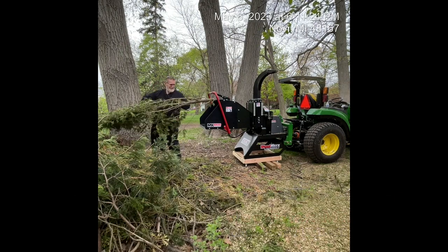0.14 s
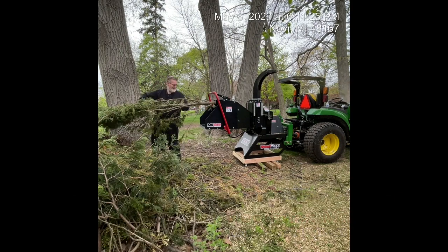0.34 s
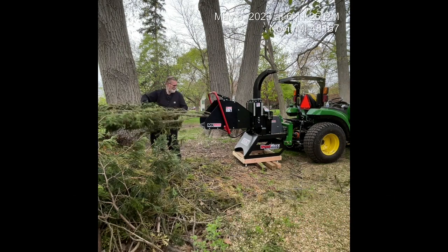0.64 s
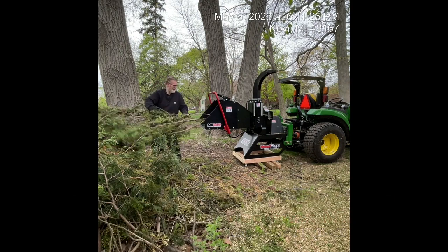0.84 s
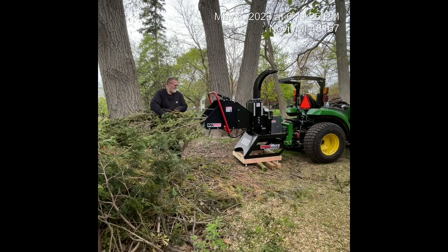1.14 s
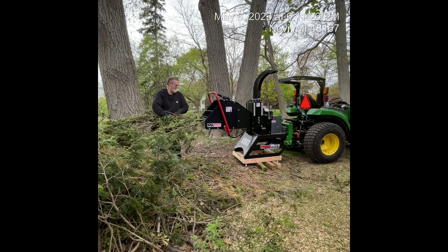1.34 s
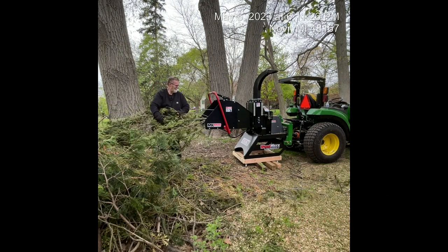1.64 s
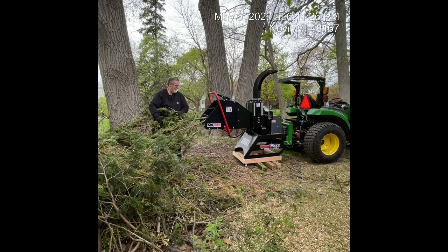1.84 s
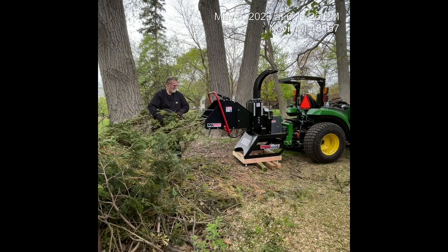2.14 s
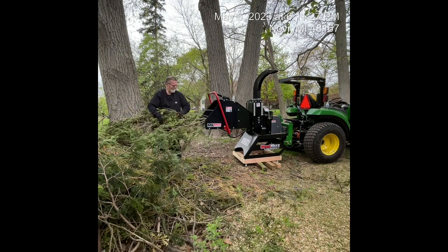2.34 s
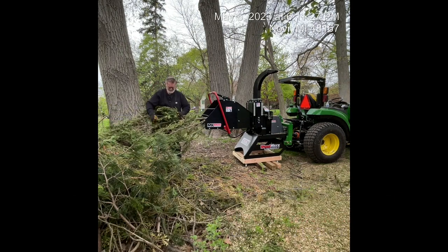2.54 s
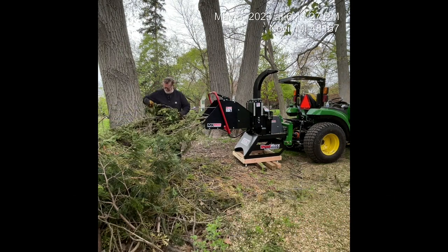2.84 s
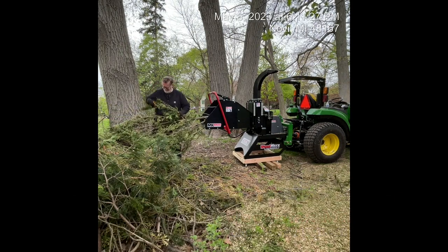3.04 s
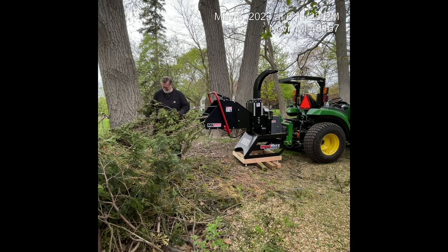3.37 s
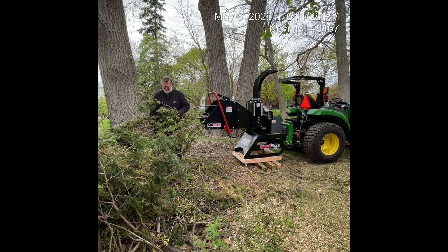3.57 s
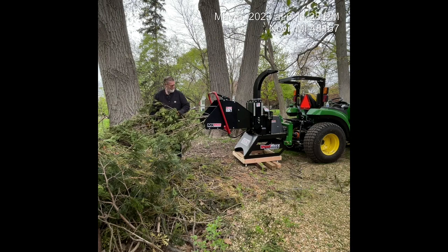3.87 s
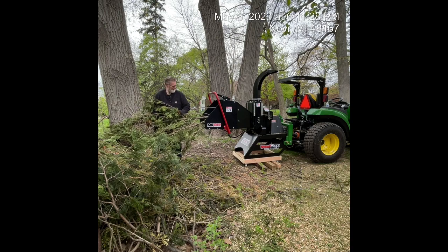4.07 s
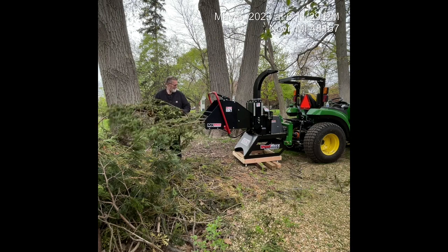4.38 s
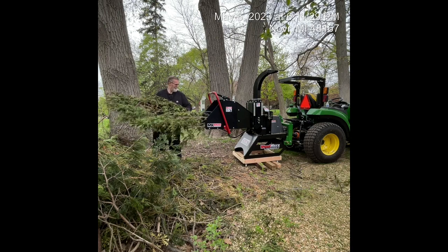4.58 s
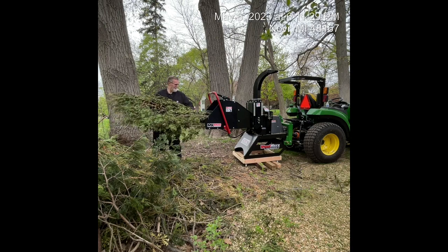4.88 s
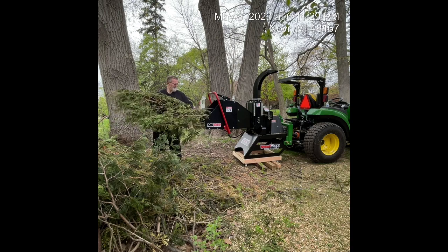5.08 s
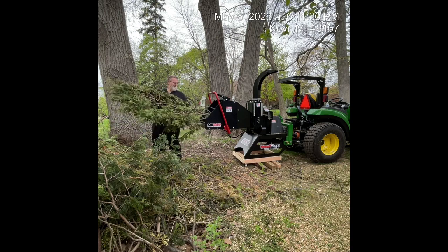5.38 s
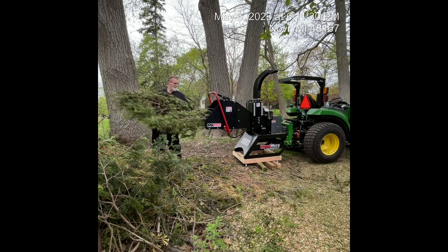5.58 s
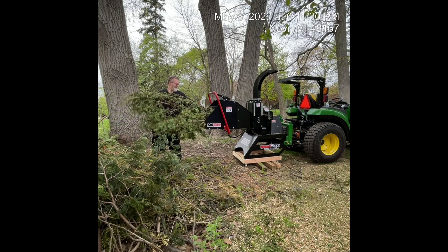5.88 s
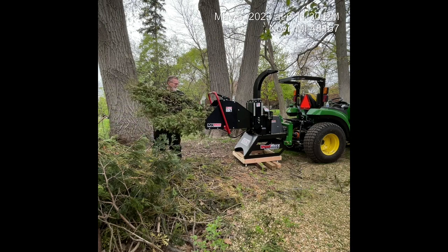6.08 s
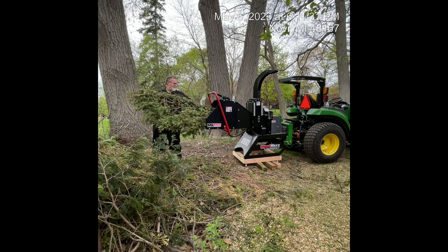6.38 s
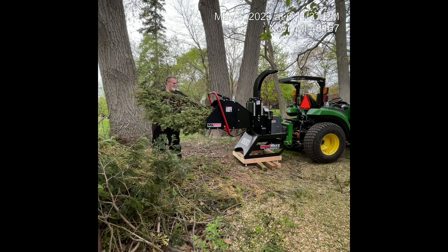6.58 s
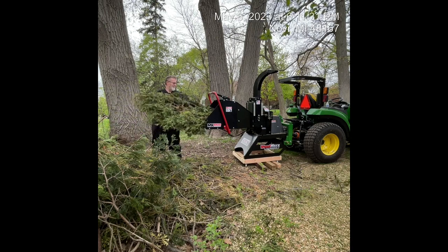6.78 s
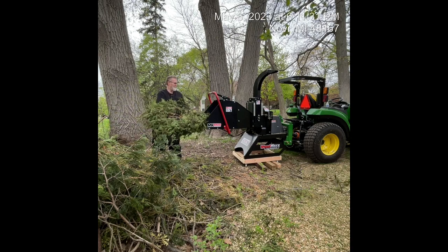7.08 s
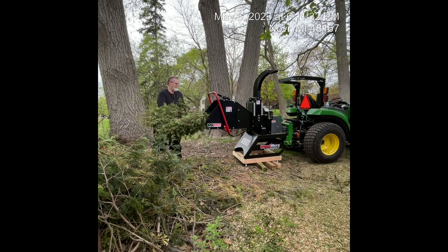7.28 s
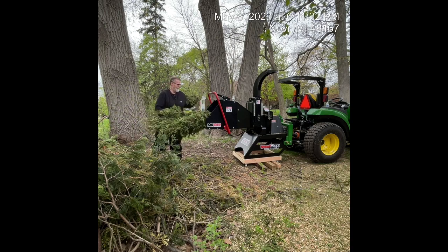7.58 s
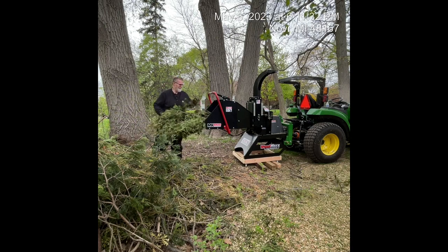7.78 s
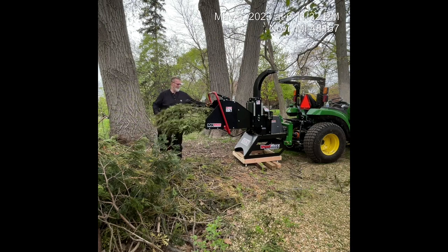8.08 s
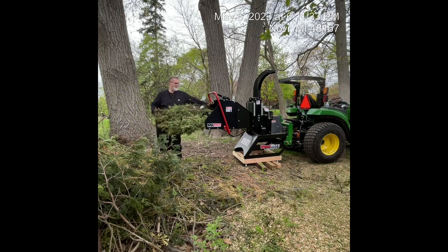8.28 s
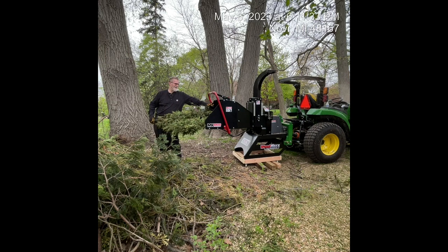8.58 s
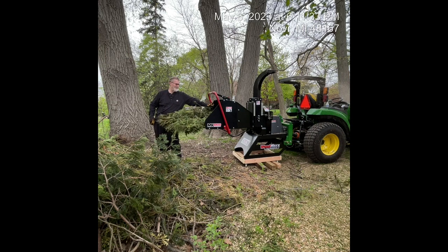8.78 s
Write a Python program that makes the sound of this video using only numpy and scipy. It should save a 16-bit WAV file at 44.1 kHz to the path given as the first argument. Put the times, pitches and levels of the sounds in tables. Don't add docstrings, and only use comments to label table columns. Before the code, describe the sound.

A low, buzzing blower drone and knocking diesel run throughout. At first thin twigs tick and rattle through the steel chipper, thinning to nothing. A long even idle follows, seeming to grow slightly louder. Near the end an armful feeds in abruptly, with thuds, metallic howls, clangs and a coarse spray of chips, the drone dropping a little in pitch. Outdoors among trees, with short scattered echoes, heard on a camera microphone from across the yard.

```python
import sys
import numpy as np
from scipy import signal
from scipy.fft import rfft, irfft
from scipy.io import wavfile
from scipy.ndimage import uniform_filter1d

SR = 44100
rng = np.random.default_rng(int(sys.argv[2]) if len(sys.argv) > 2 else 0)


def persist_wave(psi):
    counts = np.round(np.clip(psi, -1, 1) * 32767).astype(np.int16)
    wavfile.write(sys.argv[1], SR, np.atleast_2d(counts).T)


def gain_from_db(level_db):
    decades = np.asarray(level_db, float) / 20
    return 10 ** decades


N = 393372

IDLE_HZ, LOADED_HZ, SAG_FROM_S, SAG_TO_S = 40.068, 39.43, 7.3, 7.94
ENGINE_CYCLES_PER_KNIFE, KNIFE_AT = .5186, .87
SLIP_FROM_S, SLIP_HZ = 7.35, .075
WHEEL_START, ENGINE_START = (.733, -.16), (.113, .14)
# [-, dB rms each]
WHEEL_ORDERS = [(2, -58.0, -48.7, -47.4), (3, -35.4, -36.0, -32.3), (4, -47.0, -55.2, -42.5),
                (5, -44.3, -43.3, -38.2), (6, -36.6, -36.2, -40.0), (7, -46.8, -48.4, -40.7),
                (8, -39.6, -34.8, -34.1), (9, -47.2, -43.1, -42.0), (10, -40.0, -45.0, -41.0),
                (11, -60.5, -60.5, -37.0), (12, -46.5, -46.5, -39.5), (13, -51.3, -54.0, -45.0),
                (14, -50.2, -50.2, -50.2), (15, -56.8, -56.8, -47.0), (16, -56.2, -56.2, -46.0),
                (17, -60.8, -60.8, -48.0), (18, -51.8, -51.8, -51.8), (20, -49.6, -49.6, -46.0),
                (21, -60.1, -60.1, -46.0), (22, -50.7, -50.7, -43.0), (24, -62.0, -62.0, -62.0),
                (25, -66.0, -42.0, -46.0), (26, -66.0, -56.0, -45.0), (27, -61.7, -43.0, -48.0),
                (30, -60.5, -60.5, -60.5), (31, -66.0, -41.0, -50.0)]
# [s, 0-1, 0-1]
HOUSING_FILL = [
    (0, 1, 0),
    (.45, .85, 0),
    (.7, .6, 0),
    (.9, 0, 0),
    (7.45, 0, 0),
    (7.6, 0, 1),
    (8.92, 0, 1),
]
# [-, dB rms]
ENGINE_ORDERS = [(3, -41.1), (4, -56.0), (5, -56.4), (7, -51.6), (9, -60.0), (11, -57.5), (12, -55.2),
                 (14, -59.6), (15, -58.2), (17, -60.2), (18, -58.2), (20, -60.4), (21, -57.9), (23, -58.7),
                 (27, -53.5), (28, -54.6), (30, -59.6), (33, -45.5), (34, -52.9), (36, -53.9), (37, -60.8),
                 (38, -60.9), (39, -59.0), (41, -60.8), (52, -59.3), (61, -58.9), (66, -58.1), (67, -60.6),
                 (71, -56.8), (75, -59.0), (76, -49.8), (77, -58.5), (78, -60.8), (81, -55.8), (82, -55.4),
                 (85, -60.8), (86, -57.2), (87, -53.8), (89, -57.2), (95, -58.3), (96, -61.3), (100, -59.1),
                 (103, -58.1), (106, -59.9), (108, -60.0), (111, -59.9), (120, -61.3), (121, -61.3),
                 (126, -60.9), (129, -60.5)]
# [s, dB, dB]
EXHAUST_LOAD = [
    (0, 0, 0),
    (7.5, 0, 0),
    (7.7, -.8, 4),
    (8.3, -3, 5.5),
    (8.92, -3, 5),
]
# [Hz, dB rms each]
CLATTER_SPECTRUM = [(300, -71), (900, -78), (1800, -67.5), (2700, -66.5), (3500, -75.5), (4200, -84.5),
                    (6000, -83.5)]
# [Hz, dB per Hz]
ROAR_SPECTRUM = [(30, -78), (60, -67), (135, -66), (180, -70), (330, -68.5), (440, -68.5), (550, -66.5),
                 (850, -72), (1300, -75), (2600, -77.5), (4200, -91), (5200, -88.5), (8800, -90.5),
                 (9400, -99), (11300, -103), (12700, -101), (15000, -103), (15800, -112)]
# [Hz, Hz, dB]
HOUSING_MODES = [(400, 60, -8), (345, 70, -16), (560, 260, -6)]
# [Hz, Hz, dB]
HOPPER_MODES = [(666, 150, 2), (766, 32, 6), (866, 18, -12), (1000, 57, -12), (1090, 45, 3),
                (1220, 110, 6.5), (1353, 37, 12.5), (1620, 190, 12)]
# [Hz, Hz, dB]
CHUTE_MODES = [(1490, 250, -1), (1820, 92, 8.5), (2040, 320, 10), (2250, 160, -2), (2450, 150, 1),
               (2570, 130, -1), (2720, 280, 3), (3000, 620, -16)]
# [-, dB]
HOPPER_SCRAPE_ORDERS = [(13, 2.5), (14, -2), (15, -1), (16, -4.5), (17, 2), (18, 0), (19, -4), (20, 0.5),
                        (21, -5), (22, -1), (23, -12), (24, -1.5), (25, 1.5), (26, -0.5), (27, -2),
                        (28, -2), (29, 2.5), (30, 3), (31, -5), (32, 1), (33, 5), (34, 2), (35, 6), (36, 2),
                        (37, -11), (38, 6), (39, -12), (40, 6), (41, 5)]
# [s, s, dB, Hz]
HOUSING_STEMS = [
    (7.408, 0.12, -26.5, 400),
    (7.538, 0.205, -24.5, 400),
    (7.774, 0.21, -22.5, 400),
    (8.017, 0.033, -24, 350),
    (8.106, 0.29, -36, 397),
    (8.446, 0.22, -27, 405),
    (8.8, .12, -31, 396),
]
# [s, s, dB, Hz]
HOPPER_STEMS = [(-.05, 0.13, -32.5, 1220), (-.05, 0.17, -29.5, 980), (0.15, 0.39, -38, 1180),
                (0.55, 0.17, -41, 1150), (0.73, 0.03, -35, 1060), (.95, 0.36, -45, 1000),
                (7.409, .02, -28, 1060), (7.433, 0.28, -25.5, 1030), (7.456, 0.079, -28.5, 1280),
                (7.559, 0.22, -22, 1047), (7.797, 0.17, -23, 1070), (7.777, 0.17, -23.5, 790),
                (8.135, 0.25, -26.5, 890), (8.396, 0.092, -27, 1100), (8.472, 0.24, -24, 1030),
                (8.495, 0.16, -28, 1180), (8.727, 0.13, -24, 1110)]
# [s, s, dB, Hz]
CHUTE_STEMS = [(0.077, 0.73, -36, 2500), (0.067, 0.085, -32.5, 1790), (0.096, 0.096, -34, 2440),
               (.31, 0.068, -34, 1790), (0.395, 0.074, -32, 2420), (0.968, 0.21, -36.5, 2570),
               (7.449, 0.13, -25.5, 1950), (7.542, 0.34, -26.5, 2260), (7.563, 0.38, -27, 2570),
               (7.58, 0.16, -24, 1740), (7.804, 0.1, -26, 1820), (8.031, 0.033, -21.5, 2500),
               (8.08, 0.074, -29, 2720), (8.19, 0.17, -27, 2720), (8.123, 0.1, -23.5, 1820),
               (8.386, 0.053, -26.5, 1820), (8.49, .15, -32, 2500), (8.65, 0.078, -24.5, 2240),
               (8.72, 0.23, -26, 2450), (8.8, 0.083, -22.5, 1960)]
STEM_RISE_S, STEM_FADE_DB_PER_S = 0.0095, 253
# [s, dB, dB, dB]
GRIP = [(0, -5, -1, -3), (.5, -4, -1, -5), (7.39, -4, -1, -6), (7.4, -4, -1, 0), (7.46, -7, -1, 1),
        (7.94, -7, -1, 1), (8.02, 0, 1, -4), (8.2, -2, 1, -1), (8.45, -6, 0, -1), (8.64, -6, 0, -1),
        (8.75, -2, 1, -3)]
FEED_GAIN_DB, HOPPER_RATTLE_DB, CHUTE_RATTLE_DB = -3, -3, -1.5
# [Hz, dB per Hz]
SPRAY_SPECTRUM = [(300, -13), (700, -12.5), (1500, -8.5), (2700, -8), (3400, -10), (4200, -15), (5100, -10),
                  (7700, -8.5), (8800, -12), (9700, -24), (11200, -24.5), (12700, -21.5), (14000, -23.5),
                  (15800, -28)]
# [s, dB]
TWIG_FOLIAGE = [
    (0, -27),
    (.35, -29.5),
    (.65, -31.5),
    (1.0, -35),
    (1.12, -37.5),
    (1.3, -36.5),
    (1.52, -39.5),
    (1.68, -50),
    (1.8, -60),
]
# [s, dB]
ARMFUL_FOLIAGE = [(7.405, -51), (7.47, -28), (7.55, -21.5), (7.85, -18.5), (8.05, -19), (8.13, -23.5),
                  (8.185, -27), (8.24, -22), (8.72, -20.5), (8.8, -21.5), (8.92, -18.5)]
# [s, dB]
BITES = [(0.0724, -27), (0.171, -21), (.196, -17), (0.2716, -22), (0.47, -21), (0.496, -30), (0.543, -22),
         (0.5696, -18), (0.669, -25), (0.7545, -17), (.7951, -36), (0.947, -28), (1.0197, -28),
         (1.1463, -39), (1.2585, -18.5), (1.301, -27), (1.3453, -26), (1.4212, -31), (7.406, -23),
         (7.433, -15), (7.46, -24), (7.4836, -16), (7.533, -22), (7.813, -11), (7.8876, -8), (8.017, -7.5),
         (8.042, -11), (8.069, -10), (8.093, -13), (8.142, -7), (8.168, -16), (8.193, -2.5), (8.2187, -14),
         (8.243, -4), (8.268, -8), (8.294, -4), (8.321, -15), (8.3455, -16), (8.371, -10), (8.396, -13),
         (8.4218, -13), (8.447, -12.5), (8.4724, -26), (8.4983, -16), (8.523, -10), (8.5482, -11),
         (8.5976, -12), (8.624, -10), (8.648, -7), (8.673, -8), (8.699, -7.5), (8.725, -8), (8.8513, -28)]
# [s, dB, Hz]
CLANGS = [(7.4086, -17, 2320), (7.4335, -16, 2240), (7.458, -19, 1885), (7.4829, -14, 2000),
          (7.5088, -16, 2000), (7.5333, -10, 1970), (8.0943, -17, 2750), (8.1419, -10, 2640),
          (8.1945, -11, 1740), (8.221, -15, 1730), (8.247, -16, 2770), (8.269, -21, 2670),
          (8.297, -9, 2700), (8.323, -14, 2700)]
CLANG_T60_S, CLANG_GAIN_DB = 0.041, -2.2
GAIN_CEILING_DB, GAIN_GAP_DB, CREEP_S = 7, 12.5, 7.48
DUCK_AT_S, DUCK_S, DUCK_DB, SINK_S, SINK_DB = 7.492, 0.14, 6.8, 0.5, 1.7
# [Hz, spreads]
TREBLE_MARGIN = [(8800, 4), (9600, .9), (10500, 1.6), (11300, 1.1), (12400, 2.0), (13500, 1.0), (14500, .7),
                 (15800, .6)]


def evened(x):
    return x / np.sqrt(np.mean(x ** 2) + 1e-20)


def curve(rows, column=1):
    rows = np.asarray(rows)
    return np.interp(np.arange(N) / SR, rows[:, 0], rows[:, column])


def ramp(start_s, length_s):
    return np.clip((np.arange(N) / SR - start_s) / length_s, 0, 1)


def coloured(x, points):
    f, db = np.transpose(points)
    hz = np.fft.rfftfreq(len(x), 1 / SR)
    gain = gain_from_db(np.interp(np.log(hz + 1), np.log(f), db))
    return irfft(rfft(x) * gain, len(x))


def drift(hz):
    steps = rng.standard_normal(N // 256 + 2)
    smooth = signal.filtfilt(*signal.butter(2, hz * 512 / SR), steps)
    return evened(np.interp(np.arange(N) / 256, np.arange(len(steps)), smooth))


def periodic(turns, orders, start, scatter, aligned):
    k, db = np.transpose(orders)
    phase = np.where(k <= aligned, k * start[0] + start[1], scatter)
    grid = np.arange(4097) / 4096
    waves = np.cos(2 * np.pi * (np.outer(k, grid) + phase[:, None]))
    cycle = np.sqrt(2) * gain_from_db(db) @ waves
    return np.interp(turns % 1, grid, cycle)


def wheel(knives):
    k, *levels = np.transpose(WHEEL_ORDERS)
    scatter = rng.random(len(k))
    start = WHEEL_START[0], WHEEL_START[1] - .36 * np.exp(-((k - 10) / 1.1) ** 2)
    empty, with_twigs, with_armful = [periodic(knives, np.c_[k, db], start, scatter, aligned=12.5)
                                      for db in levels]
    twigs, armful = curve(HOUSING_FILL, column=1), curve(HOUSING_FILL, column=2)
    tone = (1 - twigs - armful) * empty + twigs * with_twigs + armful * with_armful
    return tone * gain_from_db(.4 * drift(5) + armful * drift(9))


def engine(knives):
    slip = SLIP_HZ * np.maximum(np.arange(N) / SR - SLIP_FROM_S, 0)
    cycles = knives * ENGINE_CYCLES_PER_KNIFE + slip
    octave = periodic(cycles, [(6, -40.2)], (ENGINE_START[0], .07), 0, aligned=7.5)
    octave = octave * gain_from_db(curve(EXHAUST_LOAD, column=2))
    strong = periodic(cycles, ENGINE_ORDERS, ENGINE_START, rng.random(len(ENGINE_ORDERS)), aligned=7.5)
    strong = strong * gain_from_db(curve(EXHAUST_LOAD))
    k = np.setdiff1d(np.arange(8, 280), np.transpose(ENGINE_ORDERS)[0])
    f, db = np.transpose(CLATTER_SPECTRUM)
    weak_db = np.interp(np.log(k * IDLE_HZ * ENGINE_CYCLES_PER_KNIFE), np.log(f), db)
    weak_db = weak_db + 4 * rng.standard_normal(len(k))
    clatter = periodic(cycles, np.c_[k, weak_db], ENGINE_START, rng.random(len(k)), aligned=0)
    throb = 1 + 0.045 * np.cos(2 * np.pi * 3 * cycles) + 0.033 * np.cos(2 * np.pi * knives)
    rush = rng.standard_normal(N) * throb * gain_from_db(0.49 * drift(9.4))
    roar = coloured(rush, ROAR_SPECTRUM) * np.sqrt(SR / 2)
    return strong + octave + clatter * gain_from_db(1.9 * drift(39)) + roar


def pressing(stems):
    t = np.arange(N) / SR
    powers = []
    for start_s, length_s, db, _ in stems:
        fade_db = STEM_FADE_DB_PER_S * np.clip(t - start_s - length_s, 0, 1)
        powers.append((ramp(start_s, STEM_RISE_S) * gain_from_db(db - fade_db)) ** 2 + 1e-14)
    return np.array(powers)


def ring(x, modes, stems, reach_hz):
    out, power = np.zeros(N), np.zeros(N)
    pressure, centre_hz = pressing(stems), np.transpose(stems)[3]
    for (hz, width_hz, db), late in zip(modes, rng.integers(0, 140, len(modes))):
        mode = np.roll(x, late)
        for pole in np.exp(-np.pi * width_hz * np.array([1, 3.0]) / SR):
            mode = signal.lfilter([1, 0, -1], [1, -2 * pole * np.cos(2 * np.pi * hz / SR), pole ** 2], mode)
        favour = np.exp(-((hz - centre_hz) / reach_hz) ** 2) @ pressure / pressure.sum(0)
        share = gain_from_db(db + .8 * drift(5)) * (.4 + favour)
        out += share * evened(mode)
        power += share ** 2
    return out * np.sqrt(pressure.sum(0) / power)


def chipping(knives):
    turn = knives - KNIFE_AT
    passes = np.floor(turn).astype(int) + 1
    strength = rng.standard_normal(passes[-1] + 1)[passes]
    blows = evened(np.diff(passes, prepend=passes[0]) * gain_from_db(strength))
    grit = rng.standard_normal(N) * gain_from_db(3.0 * np.minimum(rng.exponential(1, N), 4))
    burst = (np.exp(-(turn % 1) / 0.5) + 0.2) * gain_from_db(strength + drift(10))
    drive = blows + 1.2 * evened(grit * (burst + .3))
    spray = evened(coloured(grit * burst, SPRAY_SPECTRUM))

    boom = np.sqrt(2) * np.cos(2 * np.pi * (10 * (knives + WHEEL_START[0]) + WHEEL_START[1] - .36))
    housing = 0.7 * boom * np.sqrt(pressing(HOUSING_STEMS).sum(0))
    housing += 0.22 * ring(blows + .5 * evened(grit), HOUSING_MODES, HOUSING_STEMS, reach_hz=500)
    hopper = ring(grit * burst, HOPPER_MODES, HOPPER_STEMS, reach_hz=201)
    chute = ring(drive, CHUTE_MODES, CHUTE_STEMS, reach_hz=158)

    t = np.arange(N) / SR
    twigs = gain_from_db(curve(TWIG_FOLIAGE)) * (t < TWIG_FOLIAGE[-1][0])
    foliage = np.where(t >= ARMFUL_FOLIAGE[0][0], gain_from_db(curve(ARMFUL_FOLIAGE)), twigs)
    wood = housing + gain_from_db(HOPPER_RATTLE_DB + curve(GRIP)) * hopper
    wood += gain_from_db(CHUTE_RATTLE_DB + curve(GRIP, column=2)) * chute
    wood += foliage * spray
    return gain_from_db(FEED_GAIN_DB) * wood


def howl(knives, stems, orders, at, howl_db, reach_hz, skirt):
    pressure, centre_hz = pressing(stems), np.transpose(stems)[3]
    out, pressed = np.zeros(N), pressure.sum(0) > 1e-8
    pressure, turns = pressure[:, pressed], knives[pressed] - KNIFE_AT - at
    for k, db in orders:
        near = skirt + np.exp(-((k * LOADED_HZ - centre_hz) / reach_hz) ** 2)
        near = near * LOADED_HZ / reach_hz
        lag = .13 * rng.standard_normal()
        level = np.sqrt(near @ pressure) * gain_from_db(db + 1.6 * drift(4)[pressed])
        out[pressed] += level * np.cos(2 * np.pi * (k * turns - lag))
    return gain_from_db(FEED_GAIN_DB + howl_db) * out


def scrapes(knives):
    chute_orders = [(k, 3 * rng.standard_normal()) for k in range(42, 74)]
    hopper = howl(knives, HOPPER_STEMS, HOPPER_SCRAPE_ORDERS, at=.21, howl_db=.5, reach_hz=125, skirt=.09)
    chute = howl(knives, CHUTE_STEMS, chute_orders, at=.12, howl_db=-2.5, reach_hz=120, skirt=.1)
    return (hopper + chute) * gain_from_db(curve(GRIP, column=3))


def bites():
    out, t = np.zeros(N + SR), np.arange(2600) / SR
    shape = gain_from_db(-60 * t / 0.2) * np.minimum(t / 0.001, 1)
    for (s, db), crack in zip(BITES, rng.standard_normal((len(BITES), len(t)))):
        out[round(s * SR):][:len(t)] += gain_from_db(db) * crack * shape
    splinters = coloured(out[:N], SPRAY_SPECTRUM)
    return gain_from_db(6.0) * coloured(splinters, [(500, -2), (2000, -3.5), (5000, -1.5), (16000, -6.5)])


def clangs():
    out, t = np.zeros(N + SR), np.arange(4000) / SR
    for (s, db, hz), (apart, phase) in zip(CLANGS, rng.random((len(CLANGS), 2))):
        neighbour_hz = hz * (0.98 + 0.055 * apart)
        pair = np.sin(2 * np.pi * hz * t) + 0.67 * np.sin(2 * np.pi * (neighbour_hz * t + phase))
        shape = gain_from_db(db + CLANG_GAIN_DB - 60 * t / CLANG_T60_S) * np.minimum(t / 0.00083, 1)
        out[round(s * SR):][:len(t)] += shape * pair
    return out[:N]


def yard(x, t60_s=.6, wet_db=-7):
    t = np.arange(SR // 2) / SR
    sparse = rng.random(len(t)) < .05
    taps = rng.standard_normal(len(t)) * sparse * gain_from_db(-60 * t / t60_s) * (t > .004)
    return x + gain_from_db(wet_db) * signal.fftconvolve(x, taps / np.linalg.norm(taps))[:N]


def scene():
    speed_hz = IDLE_HZ + (LOADED_HZ - IDLE_HZ) * ramp(SAG_FROM_S, SAG_TO_S - SAG_FROM_S)
    knives = np.cumsum(speed_hz) / SR
    machine = wheel(knives) + engine(knives)
    wood = chipping(knives) + scrapes(knives) + bites() + clangs()
    return (machine + yard(wood))[None]


def treble_gaps(x):
    hz, t, z = signal.stft(x, SR, nperseg=1024, noverlap=768)
    patches = rng.standard_normal(z.shape[1:])
    patches = uniform_filter1d(patches, size=5, axis=0)
    patches = evened(uniform_filter1d(patches, size=10, axis=1))
    f, margin = np.transpose(TREBLE_MARGIN)
    spells = .3 * drift(1.0)[np.minimum(t * SR, N - 1).astype(int)]
    silent = patches + spells > np.interp(hz, f, margin)[:, None]
    kept = np.where(silent, gain_from_db(-40), gain_from_db(.6 * (hz > 9300))[:, None])
    return signal.istft(z * kept, SR, nperseg=1024, noverlap=768)[1][:, :N]


def low_pass(x):
    return signal.sosfilt(signal.butter(12, 15820, fs=SR, output="sos"), x)


def record(dry):
    t = np.minimum(np.arange(N) / SR, DUCK_AT_S)
    creep_db = GAIN_CEILING_DB - GAIN_GAP_DB * np.exp(-t / CREEP_S)
    duck_db = DUCK_DB * ramp(DUCK_AT_S, DUCK_S)
    sink_db = SINK_DB * ramp(DUCK_AT_S + DUCK_S, SINK_S)
    level = .8 * np.tanh(dry * gain_from_db(creep_db - duck_db - sink_db) / .8)
    level = signal.sosfilt(signal.butter(2, 42, "high", fs=SR, output="sos"), level)
    mix = treble_gaps(level)
    return low_pass(mix)


dry = scene()
out = record(dry)
persist_wave(out)
```